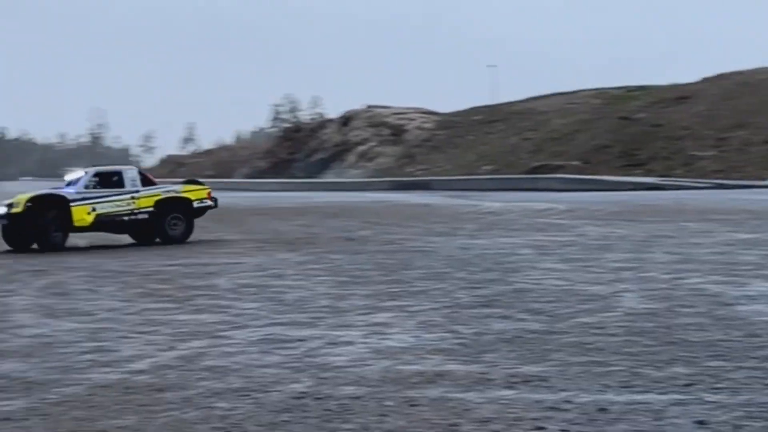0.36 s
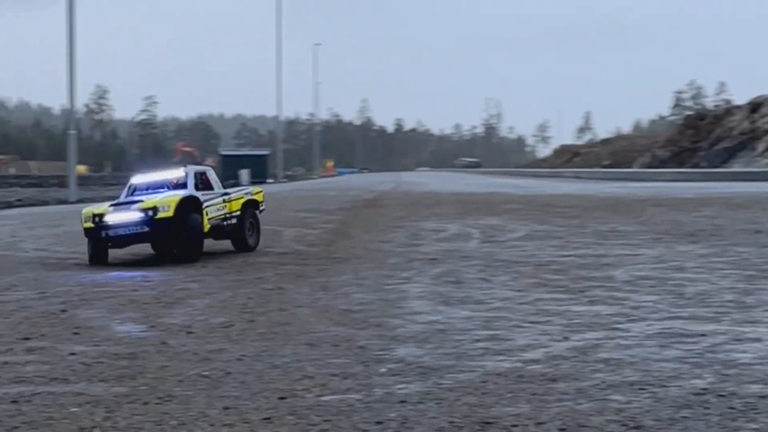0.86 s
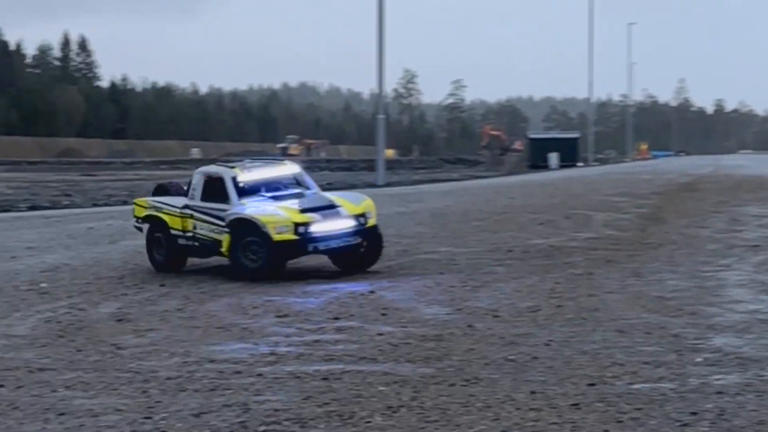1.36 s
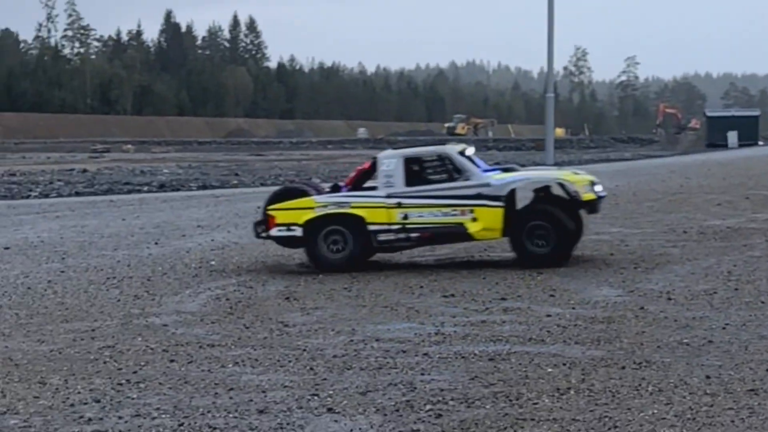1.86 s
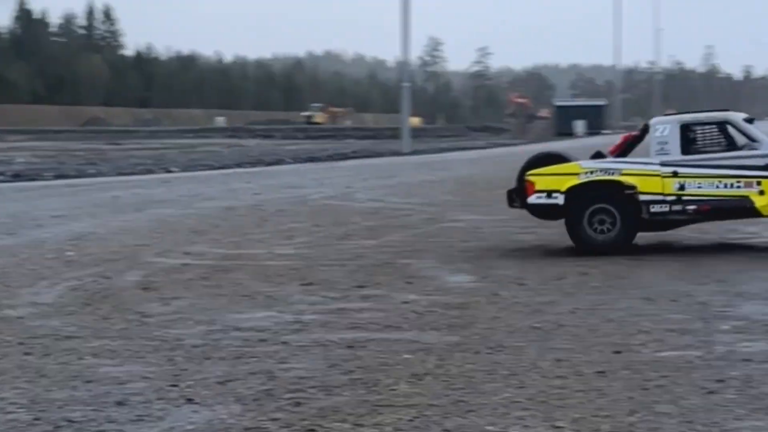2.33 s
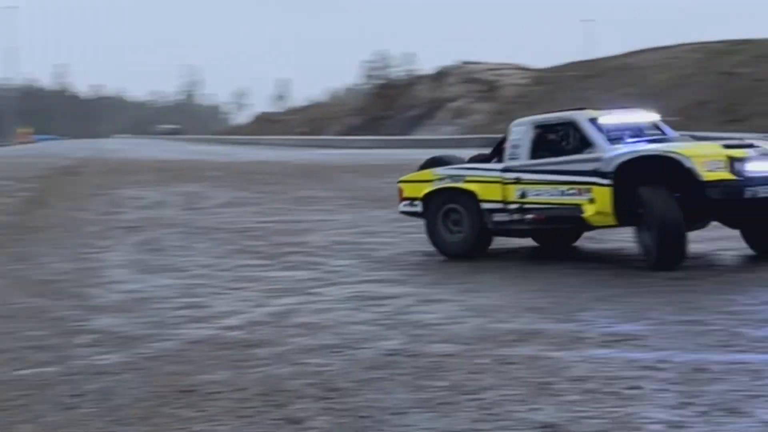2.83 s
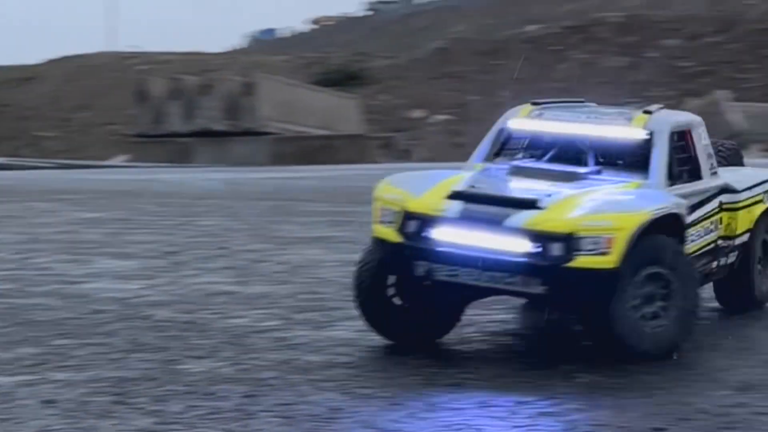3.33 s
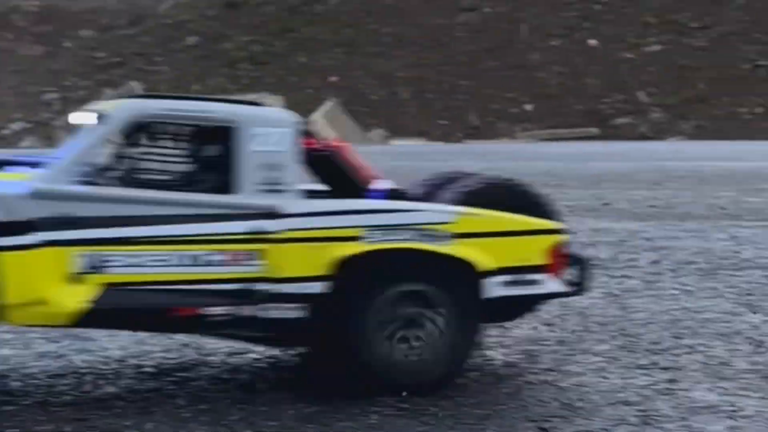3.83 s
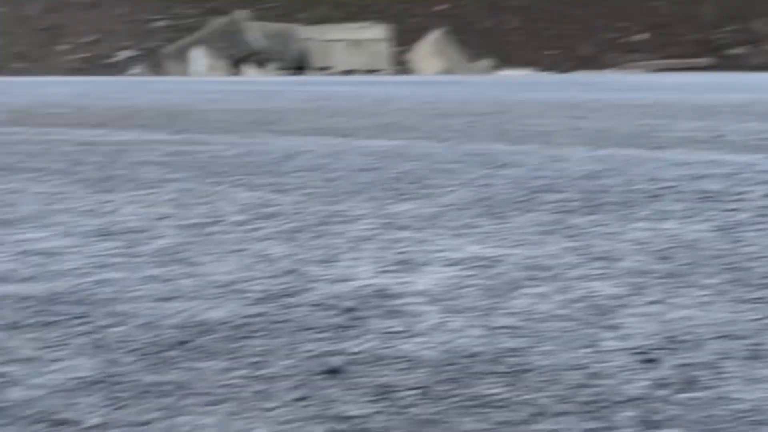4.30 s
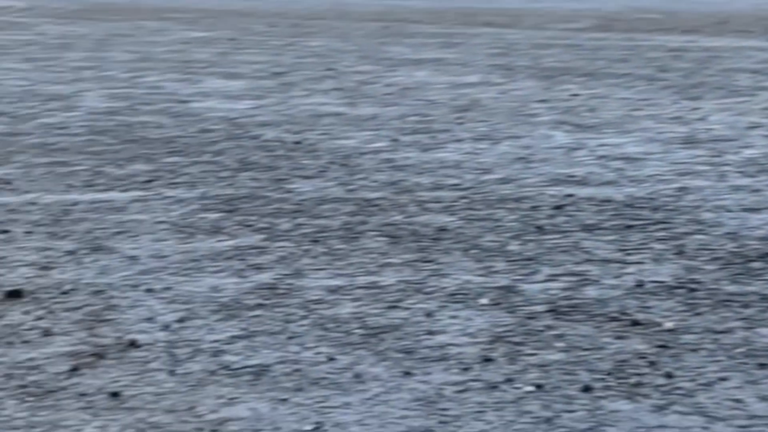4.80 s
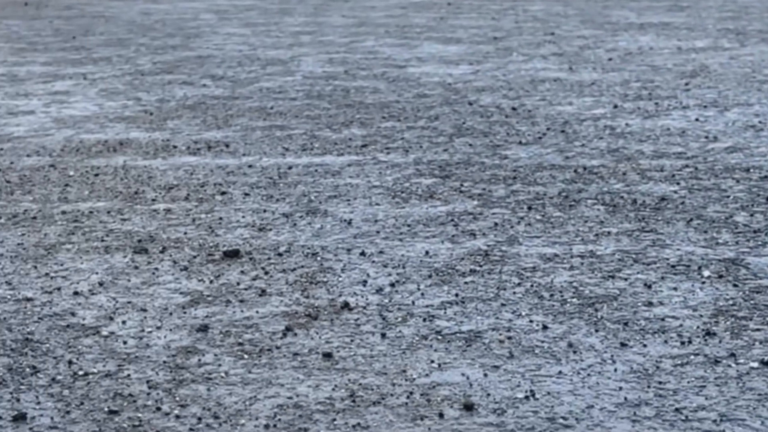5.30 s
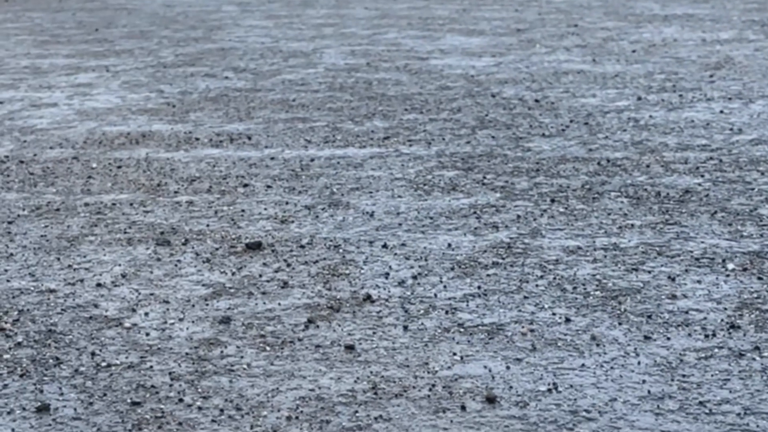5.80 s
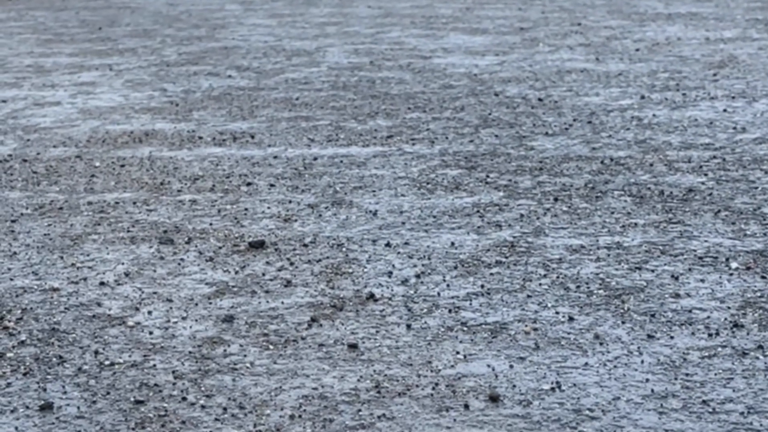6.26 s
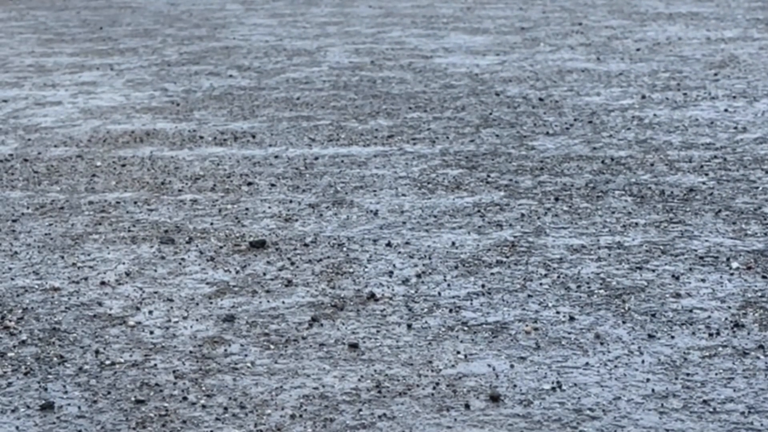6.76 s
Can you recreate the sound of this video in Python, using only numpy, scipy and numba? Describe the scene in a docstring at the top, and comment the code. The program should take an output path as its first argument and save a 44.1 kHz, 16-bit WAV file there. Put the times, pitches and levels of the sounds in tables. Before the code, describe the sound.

Large electric model truck circles on wet gravel, tyres growling and crunching, motor whining in bursts, then roars past leftward, leaving spray hiss and clicking stones.

```python
"""A large electric model truck rolls in circles on wet gravel close to a phone in an open yard, over a low far rumble.
Grains of scattered pitch make its tyres growl, crunch and fling grit; gear chatter rasps in the plastic shell.
Throttle bursts soon add squeaks, then a blurred tone: the motor whine. A patter of grit follows, then a slide
with a dying scrape and thin ticks. After the longest burst the truck leaves to the left with a hiss of wet spray,
faint coasting tones and a last few stones that click as dying sines."""
import sys
import numpy as np
from scipy import signal
from scipy.fft import rfft, irfft
from scipy.io import wavfile
from scipy.ndimage import uniform_filter1d
from numba import njit

SR = 44100
rng = np.random.default_rng(int(sys.argv[2]) if len(sys.argv) > 2 else 0)


def materialize(psi):
    """Save the field psi as 16-bit PCM at rate SR to the path in sys.argv[1].

    A 1-D psi becomes a single channel; in a 2-D psi each row is a channel.
    """
    bounded = np.clip(np.atleast_2d(psi).T, -1, 1)
    quanta = np.round(bounded * 32767).astype(np.int16)
    wavfile.write(sys.argv[1], SR, quanta)


def makeup_ratio(level_db):
    """Linear amplitude ratio for a level in decibels (20 dB per factor of ten)."""
    decades = np.asarray(level_db, float) / 20
    return 10 ** decades


N = 314874
T = np.arange(N) / SR  # time in seconds
HZ = np.maximum(np.fft.rfftfreq(N, 1 / SR), 1)  # frequency of each spectrum bin
BITE_S = 0.021  # time the tyres take to bite


def unit(x):
    """Scale a sound to rms 1."""
    return x / np.sqrt(np.mean(x ** 2))


def colour(x, points):
    """Give a flat sound the spectrum of (Hz, dB) points, at rms 1."""
    hz, db = np.transpose(points)
    curve_db = np.interp(np.log(HZ), np.log(hz), db)
    return unit(irfft(rfft(x) * makeup_ratio(curve_db), N))


def walk(rate):
    """A random, wandering level: each value is held 1 / rate seconds, then the steps are smoothed twice."""
    hold = int(SR / rate)
    steps = np.repeat(rng.standard_normal(N // hold + 1), hold)
    return uniform_filter1d(uniform_filter1d(steps, hold), hold)[:N]


@njit
def rings(length, at, hz, t60, size):
    """Each blow rings as one dying sine, which falls 60 dB in t60 seconds."""
    out = np.zeros(length)
    for k in range(len(at)):
        turn = np.exp((2j * np.pi * hz[k] - np.log(1000) / t60[k]) / SR)  # one sample of spin and decay
        z = size[k] * np.exp(.8j)
        for i in range(max(int(at[k] * SR), 0), min(int((at[k] + t60[k]) * SR), length)):
            out[i] += z.imag
            z *= turn
    return out


def strike(s, db, modes):
    """Blows at times s all ring one set of modes."""
    same = np.ones(len(s))
    return sum(rings(N, s, hz * same, t60 * same, makeup_ratio(db + mode_db)) for hz, mode_db, t60 in modes)


def resonance(hz, width_hz):
    """The response of one broad resonance, 1 at its centre."""
    return 1 / (1 + (2 * (HZ - hz) / width_hz) ** 2)


def band(x, hz, width_hz):
    """Ring a sound through one broad resonance, at rms 1."""
    return unit(irfft(rfft(x) * resonance(hz, width_hz), N))


def gravel(count, lo_hz, hi_hz, cycles, scatter_db, hiss, patchy_db):
    """Dense stone grains of scattered pitch and size over the hiss of wet rubber; loose patches come and go."""
    chance = rng.random((count, 3)).T
    hz = lo_hz * (hi_hz / lo_hz) ** chance[1]
    bigger = np.minimum(-np.log(1 - chance[2]), 5)
    size = hz * makeup_ratio(scatter_db * bigger)  # short high grains are sharper, so the sum is flat
    t60 = np.log(1000) * cycles / hz / np.pi
    grains = rings(N, chance[0] * T[-1], hz, t60, size)
    return (unit(grains) + hiss * rng.standard_normal(N)) * makeup_ratio(patchy_db * walk(14))


# Colour of the far rumble. Each row: frequency in Hz, level in dB per Hz.
RUMBLE_COLOUR = [(30, -10), (55, -7), (110, -5.5), (200, -12), (500, -25), (2000, -25.5), (4500, -27.5),
                 (7200, -28.5), (13000, -50)]


def yard():
    """Far traffic and wind: noise shaped into a low, even rumble."""
    return makeup_ratio(-50) * colour(rng.standard_normal(N), RUMBLE_COLOUR)


# The truck between bursts, as heard. Each row: time in seconds, rolling level in dB, sideways slip in dB,
# level of fan and gears in dB.
ROLLING_TRUCK = [(0, -41.5, 1, -43), (.15, -46.5, 5.5, -42.5), (.57, -41.5, 5.5, -42), (.86, -33, 0, -34),
                 (1.14, -29, -5, -42.5), (1.47, -29, -1.5, -35.5), (1.68, -35, -3, -42),
                 (1.74, -33, 2, -33), (2.33, -40, -8, -39.5), (2.38, -40.5, 5, -37),
                 (2.69, -43.5, 6.5, -37), (2.85, -30, 13, -23.5), (3.0, -25, 6, -26.5),
                 (3.15, -27, 3, -31.5), (3.5, -25.5, -1.5, -30.5), (3.62, -28.5, 3.5, -29.5),
                 (4.34, -39.5, 2.5, -41), (4.58, -31.5, -3.5, -37.5), (4.8, -36, -1.5, -36.5),
                 (5.13, -37, -4, -39.5), (5.47, -47, 5, -44), (5.6, -49, 5.5, -43.5), (6.3, -52.5, 8, -45),
                 (7.14, -56, -4.5, -48.5)]


def coasting():
    """Powers of growl, crunch, grit and gears while the truck rolls: slip throws more stones and grit."""
    s, *controls = np.transpose(ROLLING_TRUCK)
    roll_db, slip_db, gear_db = (np.interp(T, s, c) for c in controls)
    far_db = np.minimum(roll_db + 41.5, 0)  # a rolling level below -41.5 dB means far away, with less treble
    # growl, crunch, grit: dB against rolling, share of the slip, dB lost per dB of far_db
    layers = zip((0, -4, -9), (0, 0.72, 1.05), (0, 0.04, 0.78))
    db = [roll_db + rel_db + share * slip_db + dull * far_db for rel_db, share, dull in layers]
    return makeup_ratio(np.array(db + [gear_db])) ** 2


# Colour of the growl of rolling tyres. Each row: frequency in Hz, level in dB per Hz.
ROLLING_COLOUR = [(60, -8.5), (120, -23.5), (230, -2.5), (450, -1.5), (650, -2), (850, -4), (1100, -10),
                  (2200, -54)]
# Colour of the growl of spinning tyres. Each row: frequency in Hz, level in dB per Hz.
SPINNING_COLOUR = [(60, -27), (120, -13.5), (230, -3), (420, -2.5), (650, 1), (850, -1), (1100, -9.5),
                   (2200, -62)]


def tyre_growl(rolling, pulling):
    """Low lumps growl under the tyres, darker when rolling than spinning; the ground scatters a blurred part."""
    level = np.sqrt(rolling + pulling)
    calm = rolling / level ** 2
    lumps = gravel(count=12000, lo_hz=80, hi_hz=1500, cycles=8, scatter_db=1.8, hiss=.5, patchy_db=.8)
    mix = calm * colour(lumps, ROLLING_COLOUR) + (1 - calm) * colour(lumps, SPINNING_COLOUR)
    scattered = makeup_ratio(-25.5) * level * colour(rng.standard_normal(N), SPINNING_COLOUR)
    return level * mix, scattered


# Colour of the crunch. Each row: frequency in Hz, level in dB per Hz.
CRUNCH_COLOUR = [(1000, -57), (1500, -1.5), (1900, -3.5), (2400, -3.5), (3300, -2), (4200, -9), (5500, -16),
                 (8000, -51)]


def stone_crunch(level, stones):
    """Stones grind under the tyres: middle grains that follow the crunch level."""
    return level * colour(stones, CRUNCH_COLOUR)


# Colour of the grit. Each row: frequency in Hz, level in dB per Hz.
GRIT_COLOUR = [(4000, -4.5), (6800, -2.5), (8200, -2.5), (10500, -5.5), (12000, -13), (15500, -13.5)]
# Grit flung towards the phone. Each row: time in seconds, change of the grit level in dB.
FLUNG_GRIT = [(.7, -0.5), (1.2, 2), (2.1, -4), (2.82, 2), (4.1, 0), (5.4, 0), (5.7, -8)]


def flung_grit(level, fine):
    """Fine bright grains fly off the tyres, more or fewer of them towards the phone."""
    return level * makeup_ratio(np.interp(T, *np.transpose(FLUNG_GRIT))) * colour(fine, GRIT_COLOUR)


# Broad resonances of the plastic body. Each row: frequency in Hz, width in Hz, level in dB.
SHELL_MODES = [(948, 110, 2), (1126, 142, 5.5), (1365, 224, 3), (1826, 79, -7), (2278, 140, -8),
               (2583, 300, -7), (3160, 91, -10.5), (3630, 180, -10.5), (5530, 35, -7)]


def shell_rasp():
    """Gear chatter and fan air ring the few broad modes of the plastic body."""
    chatter = gravel(count=12000, lo_hz=800, hi_hz=6000, cycles=10, scatter_db=1.2, hiss=.8, patchy_db=.5)
    modes = sum(makeup_ratio(db) * resonance(hz, width) for hz, width, db in SHELL_MODES)
    return unit(irfft(rfft(chatter) * modes, N))


# Bursts of throttle. Each row: start in seconds, length in seconds, wheelspin level in dB at the burst's end,
# sideways slip in dB, gear load in dB at the start.
THROTTLE_BURSTS = [(0.171, 0.11, -34, 2, -33.5), (0.571, 0.17, -31.5, 5.5, -34),
                   (1.738, 0.38, -23, 3.5, -25), (2.7, 0.026, -28.5, -1.5, -23),
                   (2.764, 0.078, -30, 8.5, -34), (3.535, 0.021, -23, -4.5, -23.5),
                   (3.627, 0.51, -17.5, 1.5, -22), (5.147, 0.073, -30.5, -0.5, -32.5),
                   (5.32, 0.045, -33, 1, -32), (5.49, 0.021, -48, -4, -43)]


def bursts():
    """Powers of growl, crunch, grit and gears: a burst bites, swells as the wheels spin up, dies on lift-off."""
    spin_up_s, gear_sag_db_per_s = 0.17, 4.5
    power = np.zeros((4, N))
    for start, length, spin_db, slip_db, gear_db in THROTTLE_BURSTS:
        since = np.maximum(T - start, 0)
        fall_s = 0.073 + 0.24 * length  # time to fall 20 dB, longer after a long burst
        after = np.maximum(since - length, 0) / fall_s
        shape = np.clip(since / BITE_S, 0, 1) ** 2 * makeup_ratio(-20 * np.minimum(after, 4) ** 2)
        lag = np.exp(-np.minimum(since, length) / spin_up_s) - np.exp(-length / spin_up_s)
        # growl, crunch, grit: dB against wheelspin, share of the slip, dB held back until the wheels spin up
        layers = zip((0, -4, -8.5), (0, 0.72, 1.05), (12, 11.5, 14))
        db = [spin_db + rel_db + share * slip_db - held_db * lag for rel_db, share, held_db in layers]
        db.append(gear_db - gear_sag_db_per_s * since)
        power += (shape * makeup_ratio(np.array(db))) ** 2
    return power


def gear_mesh(pulling_grit, fine):
    """Gear teeth sing in one broad high band as the wheels spin up, 16.5 dB below the grit thrown."""
    return makeup_ratio(-16.5) * np.sqrt(pulling_grit) * band(fine, 6860, 1400)


# Brief tones under load: squeaks of rubber and gears, and at 2.813 s a tone near three times the whine's pitch.
# # Each row: time in seconds, rms level in dB, pitch in Hz, length in seconds.
LOAD_SQUEAKS = [(.195, -30, 1080, .01), (0.275, -36.5, 406, 0.027), (2.813, -22, 1850, .032),
                (3.194, -28, 501, 0.026), (4.09, -33, 6220, .035)]


def squeaks(grip):
    """Brief tones swell under load: short swells of a wavering sine."""
    out, waver = 0, 1 + .012 * walk(200)
    for s, db, hz, length in LOAD_SQUEAKS:
        swell = np.exp(-.5 * ((T - s) / length * 2) ** 2)
        sine = np.sin(2 * np.pi * hz * np.cumsum(waver) / SR)
        out = out + makeup_ratio(db) * swell * grip * np.sqrt(2) * sine
    return out


# Motor whine: one list for each spin-up, then three faint coasting tones.
# Each row: time in seconds, pitch in Hz, rms level in dB.
MOTOR_WHINE = [
    [(1.84, 430, -31), (1.95, 540, -27.5), (2.05, 596, -28.5), (2.12, 722, -34), (2.2, 640, -26)],
    [(2.77, 520, -21), (2.81, 613, -27), (2.86, 810, -26), (3.0, 780, -29.5)],
    [(3.76, 460, -22), (3.9, 560, -22.5), (4.02, 610, -14.5), (4.07, 700, -24), (4.1, 750, -20.5),
     (4.2, 660, -23), (4.28, 658, -26)],
    [(4.6, 1020, -44), (4.85, 975, -42), (5.12, 930, -47)],
    [(5.78, 664, -56.5), (6.05, 630, -55.5), (6.28, 599, -56.5)],
    [(5.4, 930, -48.5), (5.95, 885, -55.5)],
]


def motor_whine(grip):
    """The motor sings a rough tone; the harder it pulls, the more the pitch shakes and smears into noise."""
    out, shake = 0, walk(90)
    smear = unit(walk(190)) + 1j * unit(walk(190))
    for rows in MOTOR_WHINE:
        s, hz, db = np.transpose(rows)
        load = np.clip((db.max() + 55) / 25, .16, 1)
        blur = 1.2 * load
        pitch = np.interp(T, s, hz) * (1 + .03 * load * shake)
        phase = 2 * np.pi * np.cumsum(pitch) / SR
        fade = np.clip(np.minimum(T - s[0], s[-1] - T) / 0.028, 0, 1)
        tone = (np.exp(1j * phase) * (grip + blur * smear)).imag
        tone = tone / np.hypot(np.sqrt(.5), blur)  # keeps rms 1
        out = out + fade * makeup_ratio(np.interp(T, s, db)) * tone
    return out


# Fine grit landing close by. Each row: time in seconds, starting rms level in dB.
GRIT_PATTERS = [(2.432, -55), (6.615, -59), (6.955, -58.5)]


def patters():
    """Landing grit is a short bright fizz: noise above about 9 kHz that falls 60 dB in 0.15 s."""
    fizz = unit(irfft(rfft(rng.standard_normal(N)) / (1 + (9000 / HZ) ** 8), N))
    fall = sum(makeup_ratio(rms_db - 60 * np.maximum(T - at, 0) / .15) * (T > at) for at, rms_db in GRIT_PATTERS)
    return fizz * fall


def tyre_scrape(stones):
    """The tyres scrape as the slide begins: stones in one band near 2 kHz, falling 60 dB in 0.6 s."""
    sliding = np.maximum(T - 2.8, 0)
    level = np.clip(sliding / BITE_S, 0, 1) * makeup_ratio(-26 - 60 * sliding / 0.6)
    return level * band(stones, 1970, 650)


# Thin high ticks. Each row: time in seconds, peak level in dB.
THIN_TICKS = [(2.9821, -28), (3.0071, -29), (3.1727, -32), (3.1901, -34)]


def ticks():
    """Each tick is one thin high ring."""
    s, db = np.transpose(THIN_TICKS)
    return strike(s, db, [(13050, 0, 0.015)])  # Hz, dB, seconds to fall 60 dB


# Colour of the spray. Each row: frequency in Hz, level in dB per Hz.
SPRAY_COLOUR = [(8500, -16), (9700, -7), (10500, -5), (11300, -10), (12500, -28)]


def wet_spray(rolling, fine):
    """Wet spray hisses off the rear tyres while the truck heads away; it follows the rolling level and fades."""
    start_s, rise_s, level_db, fade_db_per_s = 4.3, 0.1, -14, 4.5
    away = np.clip((T - start_s) / rise_s, 0, 1) * makeup_ratio(-fade_db_per_s * (T - start_s))
    return away * makeup_ratio(level_db) * np.sqrt(rolling) * colour(fine, SPRAY_COLOUR)


# Single stones that click. Each row: time in seconds, strength of the crack in dB, knock against crack in dB.
CLICKING_STONES = [(5.697, -38, 5), (6.409, -28.5, -11), (6.4185, -25.5, -3.5), (6.4585, -45, -6),
                   (7.022, -43, 0)]
# Rings of the bright crack. Each row: frequency in Hz, level in dB, seconds to fall 60 dB.
CRACK_RINGS = [(4200, -12, 0.0037), (5600, -4, .005), (6470, 1, 0.0051)]
# Rings of the duller knock. Each row: frequency in Hz, level in dB, seconds to fall 60 dB.
KNOCK_RINGS = [(2330, 0, 0.011), (3100, -4, 0.0091)]


def stone_clicks():
    """A stone is a bright crack plus a duller knock, with its top softened above 10 kHz."""
    s, db, knock_db = np.transpose(CLICKING_STONES)
    clicks = strike(s, db, CRACK_RINGS) + strike(s, db + knock_db, KNOCK_RINGS)
    return irfft(rfft(clicks) / (1 + 1j * HZ / 10000) ** 2, N)  # softens the top above 10 kHz


def truck():
    """All that the truck sends to the phone, and the blurred growl that the ground scatters to the sides."""
    rolling, pulling = coasting(), bursts()
    _, crunch_level, grit_level, rasp_level = np.sqrt(rolling + pulling)
    stones = gravel(count=36000, lo_hz=1100, hi_hz=7000, cycles=22, scatter_db=1.8, hiss=.5, patchy_db=1.0)
    fine = gravel(count=60000, lo_hz=3500, hi_hz=16000, cycles=35, scatter_db=1.7, hiss=.7, patchy_db=1.2)
    surge = unit(makeup_ratio(1.9 * walk(15)))  # stones and grit come in shared heaps
    grip = unit(1.7 + walk(110))  # roughness shared by whine and squeaks
    growl, scattered = tyre_growl(rolling[0], pulling[0])
    low = growl + rasp_level * shell_rasp()
    bright = stone_crunch(crunch_level, stones) + flung_grit(grit_level, fine) + gear_mesh(pulling[2], fine)
    direct = np.sqrt(surge) * low + surge * bright
    direct = direct + squeaks(grip) + motor_whine(grip) + patters() + tyre_scrape(stones)
    direct = direct + ticks() + wet_spray(rolling[0], fine) + stone_clicks()
    return direct, scattered


# Where the truck is. Each row: time in seconds, lean to the left in dB (below zero: to the right).
TRUCK_BEARING = [(0, 1.3), (1.4, -0.06), (2.25, -1), (2.7, -3), (2.85, -0.5), (3.6, 0.1), (4.0, 2.5),
                 (4.45, 6.5), (7.14, 3)]


def scene():
    """The phone tells left from right only in the middle range, where the nearer side is louder and earlier."""
    sound, scattered = truck()
    octaves_off = np.log2(HZ / 750)
    beam = np.exp(-.5 * (octaves_off / 1.07) ** 2 + 1j)  # 1j: a lead of one radian
    beam = beam / (1 + (HZ / 1470) ** 8)
    lean = 0.13 * np.interp(T, *np.transpose(TRUCK_BEARING))
    side = lean * irfft(rfft(sound) * beam, N)
    around = scattered + makeup_ratio(-18.5) * yard()
    spread = irfft(rfft(around) / (1 + (HZ / 1100) ** 6), N)  # only low sound comes from all round
    return sound + yard() + (side + spread) * np.array([[1], [-1]])


def roll_off(x):
    """The treble ends steeply here."""
    return signal.sosfilt(signal.butter(12, 15710, fs=SR, output="sos"), x)


# The two microphone ports. Each row: frequency in Hz, lead of the left port in radians.
PORT_LEAD = [(6700, 0), (7350, 1.3), (7870, np.pi), (8630, np.pi), (9300, 1.2), (10200, .8), (10500, 0),
             (13200, 0), (15600, -2.3)]


def record(dry):
    """The ports shift the treble against each other, fully opposed near 8 kHz; the deepest bass is cut."""
    lead = np.interp(HZ, *np.transpose(PORT_LEAD))
    bass_cut = 1 / np.sqrt(1 + (45 / HZ) ** 8)
    shift = np.exp(.5j * lead * np.array([[1], [-1]]))  # half the lead to each side
    mix = irfft(rfft(dry) * bass_cut * shift, N)
    return roll_off(mix)


dry = scene()
out = record(dry)
materialize(out)
```